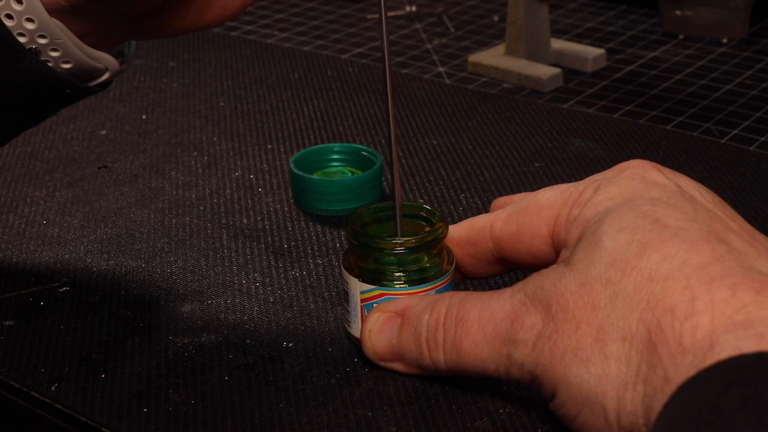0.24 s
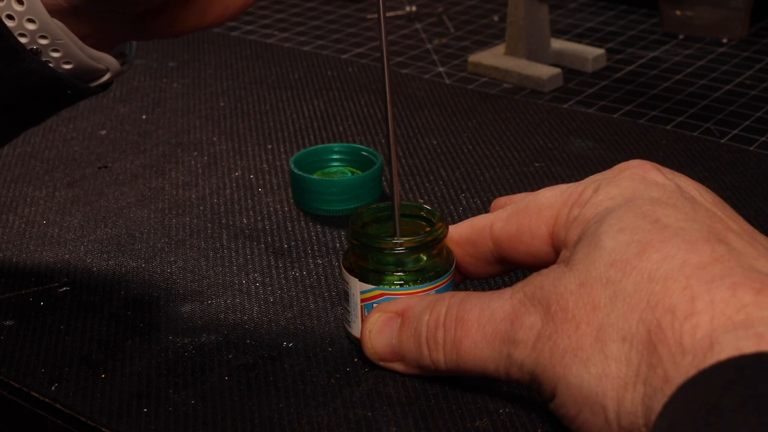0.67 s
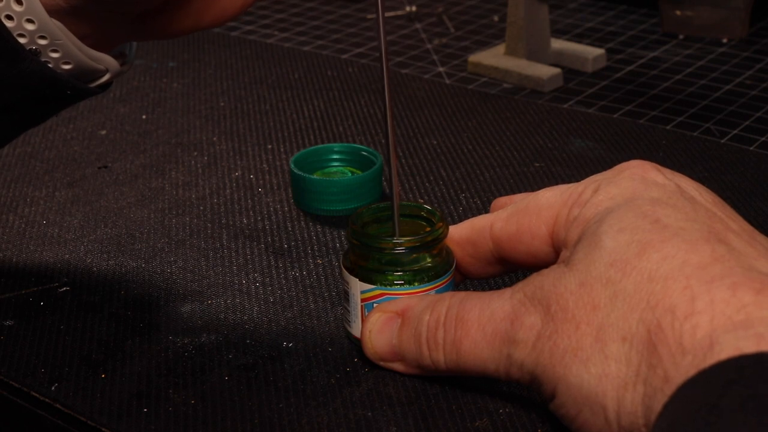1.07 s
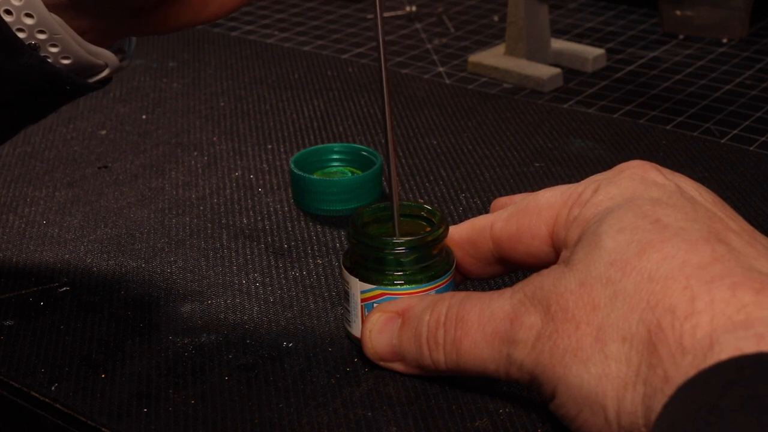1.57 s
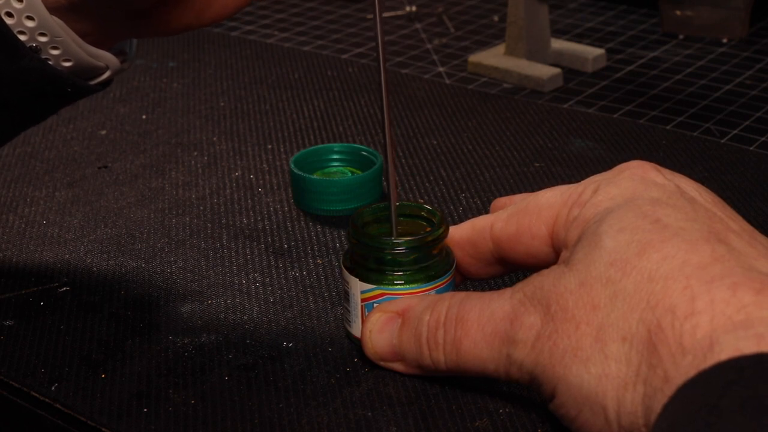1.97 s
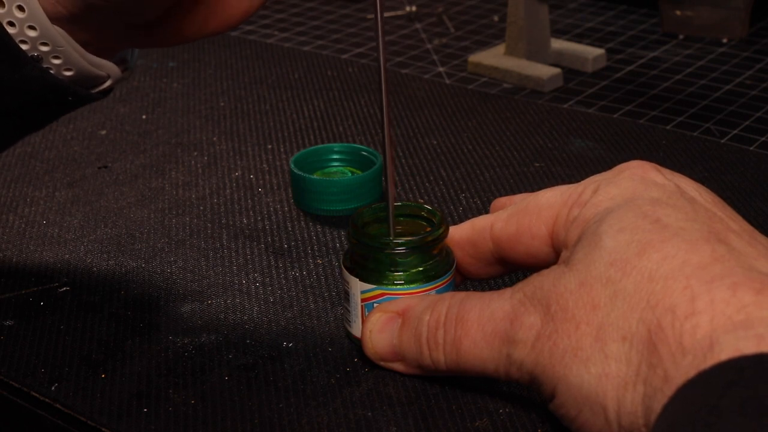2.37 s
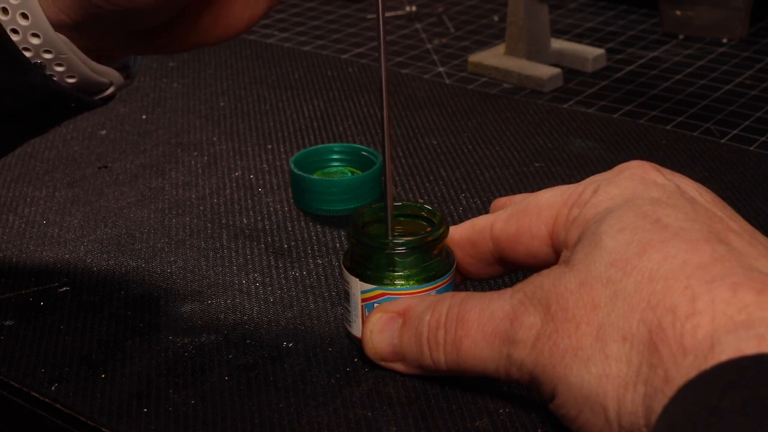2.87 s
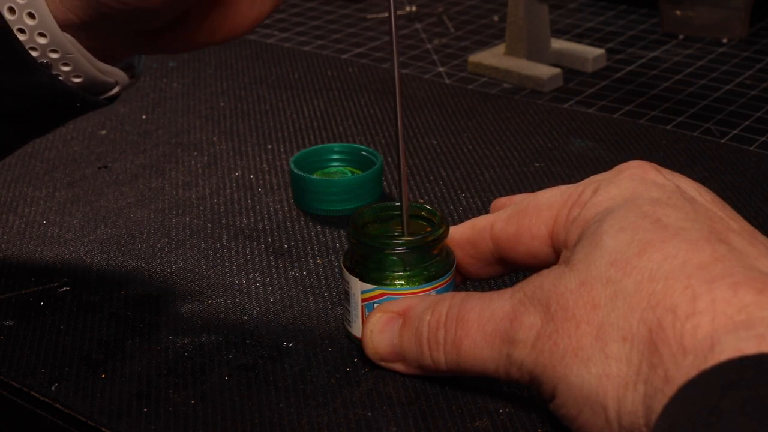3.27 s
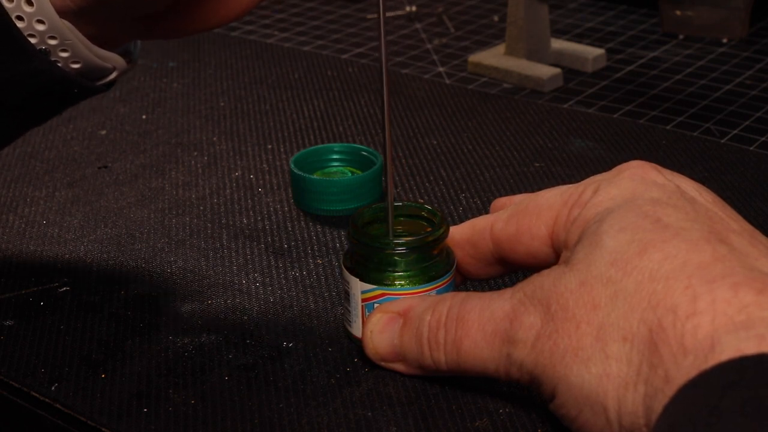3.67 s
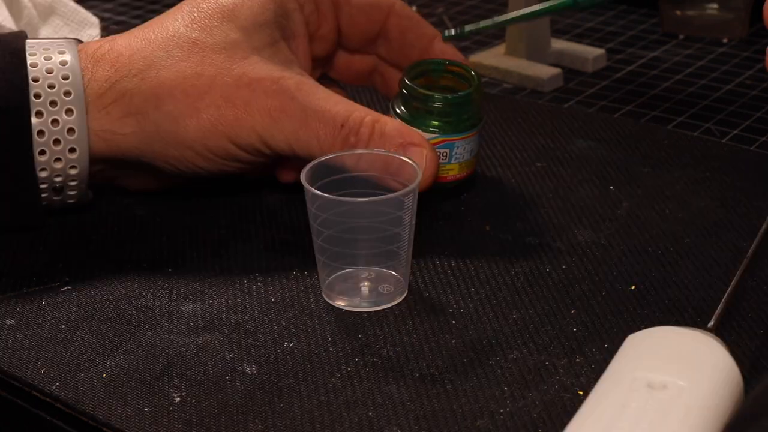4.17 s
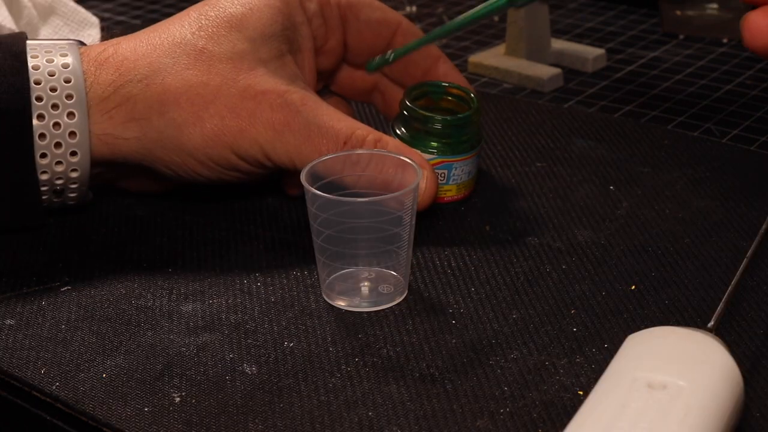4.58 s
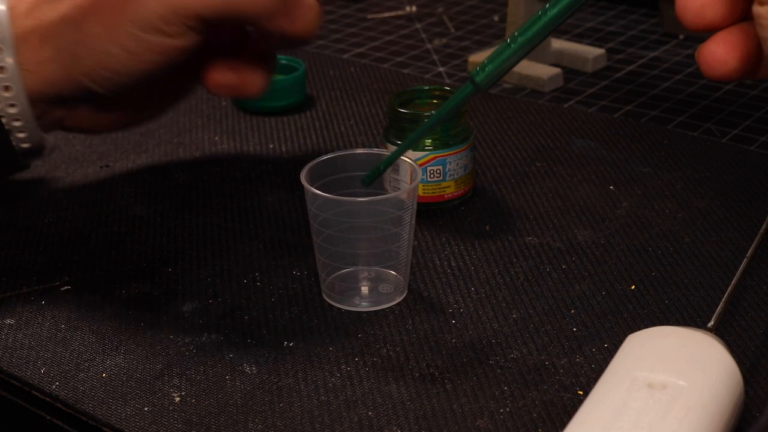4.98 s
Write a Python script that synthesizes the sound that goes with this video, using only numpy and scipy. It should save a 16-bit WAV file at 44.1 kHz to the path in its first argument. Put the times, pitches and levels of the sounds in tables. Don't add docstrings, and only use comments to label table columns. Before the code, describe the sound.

Close stereo microphones on a workbench catch a small handheld electric mixer whirring with a high, fizzy whine and a loose shaft rattling in its housing. Paint soon gulps and sloshes in a glass jar; later the stirrer chatters against the glass in short bursts. The mixer sound cuts off abruptly, leaving quiet room hiss and low hum, with a few small plastic taps and a short slide at the end.

```python
import sys
import numpy as np
from scipy import signal
from scipy.fft import rfft, irfft
from scipy.io import wavfile
from scipy.ndimage import uniform_filter1d

SR = 44100
rng = np.random.default_rng(int(sys.argv[2]) if len(sys.argv) > 2 else 0)


def to_wav(sig):
    pcm = np.clip(np.atleast_2d(sig), -1, 1) * 32767
    pcm = np.round(pcm).astype(np.int16)
    wavfile.write(sys.argv[1], SR, pcm.T)


def gain_from_db(level_db):
    decades = np.asarray(level_db, float) / 20
    return 10 ** decades


N = 231055

# frequency [Hz], level [dB per Hz].
ROOM_HISS = [(30, -100), (45, -81.5), (105, -79.5), (140, -86.5), (500, -89.5), (2000, -96.5), (9000, -104),
             (16000, -109)]
# frequency [Hz], left minus right [dB].
PORT_COLOUR = [(60, 2), (400, 2.5), (700, 1.5), (1300, -1.3), (2400, -3), (4400, 0.4), (8100, -3.5),
               (15000, -2)]
# start [s], peak [dB], pitch [Hz], width [Hz].
PLASTIC_TAPS = [
    (4.413, -41.5, 2700, 500),
    (4.818, -40, 2800, 900),
    (4.821, -45, 139, 45),
    (4.821, -44.5, 245, 60),
    (4.822, -40.5, 446, 250),
    (4.884, -42, 3000, 500),
    (4.912, -43, 5200, 900),
    (4.99, -38, 400, 400),
    (5.001, -38.5, 2350, 300),
    (5.001, -35, 4000, 4000),
]
# time [s], level [dB].
SLIDE_LEVEL = [(4.8, -90), (4.86, -64), (4.883, -57), (4.9, -67), (4.95, -60), (5.0, -58), (5.03, -67),
               (5.1, -67), (5.2, -87)]
# frequency [Hz], width [Hz], level [dB].
CUP_MODES = [(2350, 250, -1), (3000, 350, 0), (3720, 500, -3), (5300, 965, -19)]
# frequency [Hz], width [Hz], level [dB].
BENCH_MODES = [(185, 14, -9), (216, 12, -10), (284, 13, -4), (402, 22, -9), (556, 32, 0), (668, 45, -3)]
# frequency [Hz], width [Hz], level [dB].
JAR_MODES = [(964, 400, -2), (1335.5, 198, -10.5), (1658, 95, -14.5), (1995, 340, -5.5), (2570, 350, -0.5),
             (2942, 306, 1), (3560, 600, -4), (4330, 190, -11), (4880, 510, -7), (6970, 2170, -3),
             (9200, 2600, -5.5), (13300, 1100, -5.5)]
# start [s], number of blows, level [dB].
CHATTER_BOUTS = [(2.8793, 5, -12), (2.9114, 4, -13.5), (2.9377, 3, -11.5), (2.9638, 1, -19),
                 (2.9756, 1, -17.5), (2.9803, 2, -13), (3.0062, 2, -14), (3.0225, 1, -12.5),
                 (3.0378, 1, -13.5), (3.0499, 2, -14), (3.352, 1, -6.5), (3.3572, 2, -14.5),
                 (3.3786, 5, -10), (3.4059, 8, -13.5), (3.457, 3, -11.5), (3.479, 8, -10),
                 (4.1626, 3, -10.5), (4.1843, 1, -16)]
# frequency [Hz], width [Hz], level [dB].
PAINT_MODES = [(2370, 420, -8.5), (2655, 200, 1.5), (2950, 350, 2), (3322, 860, -5), (6520, 1730, 3)]
# time [s], peak [dB], release [s].
PAINT_GULPS = [(0.338, -40, 0.0066), (.41, -35.5, 0.21), (.67, -35.5, 0.018), (.765, -28, 0.016),
               (.8, -40.5, 0.26), (0.984, -33.5, 0.004), (1.1, -39, 0.094), (1.171, -32.5, .015),
               (1.29, -37, 0.62), (1.56, -45, 0.024), (1.75, -39, 0.16), (1.91, -39.5, 0.41)]
# frequency [Hz], width [Hz], level [dB].
HOUSING_MODES = [(930, 127, -6), (1324, 200, -1.5), (1638, 102, -8.5), (1847, 75, -4.5), (2350, 330, 1),
                 (2770, 340, -1), (3600, 380, 1), (4470, 255, -1.5), (6520, 450, -7), (12500, 3000, -29)]
# frequency [Hz], width [Hz], level [dB].
KNOCK_MODES = [(974, 240, -0.5), (1284, 330, -2.5), (1880, 310, 1), (2320, 380, -4), (3000, 460, 0.5),
               (3680, 910, 0.5), (4770, 540, -3.5), (6760, 530, -14)]
# time [s], level [dB].
SHAFT_KNOCKS = [(.0034, -21), (.1985, -23), (.3367, -22), (.4782, -20), (.6613, -21), (.754, -19),
                (.9808, -20), (1.0956, -21), (1.1662, -20), (1.3086, -22), (1.5029, -19), (1.7582, -21),
                (1.8483, -20), (1.9418, -20), (2.0941, -20), (2.2176, -21), (2.3322, -23), (2.415, -20),
                (2.5287, -20), (2.5899, -19), (2.7438, -19), (3.1213, -21), (3.2703, -20), (3.6107, -21),
                (3.7421, -21), (3.9028, -20), (4.0269, -19), (4.1114, -20), (4.1413, -20), (4.208, -20)]
# multiple of the turn rate, level upright [dB], level leaning [dB].
SHAFT_TONES = [(3, -69, -65), (5, -49, -62), (7, -44.5, -59.5), (8, -52, -44), (9, -52, -57),
               (15, -53, -47), (18, -62, -48), (21, -45.5, -51.5), (24, -53.5, -61), (27, -57.5, -62)]
# time [s], lean [0 to 1].
SHAFT_LEAN = [(0, 0.05), (1.0, 0.06), (1.4, 0.3), (1.54, 0.54), (1.7, 0.22), (2.35, 0.05), (2.5, .7),
              (3.4, 0.73), (3.75, 0.99)]
# time [s], turns per second [Hz].
SHAFT_SPEED = [(0, 187.8), (.08, 183.2), (.2, 182), (.8, 183.2), (1.06, 182.7), (1.25, 189.1),
               (1.45, 191.5), (1.7, 194.1), (1.85, 188.7), (2.1, 185), (2.39, 181.1), (2.45, 192.1),
               (2.54, 196.3), (2.85, 194.4), (3.3, 195.5), (3.75, 200.3), (4.1, 201.9), (4.21, 196.3)]
# time [s], change [Hz], rise [s], recovery [s].
STIRRER_SLIPS = [
    (.576, 8, 0.069, 0.082),
    (0.882, 5, .08, 0.063),
    (1.113, 3.5, 0.048, .05),
    (1.321, -2.5, 0.055, 0.11),
    (1.54, 9, 0.081, 0.069),
    (1.975, 7.5, .12, 0.075),
    (2.2, 3.5, .05, .1),
    (2.92, -9, .07, .3),
    (3.42, -5, .06, 0.09),
    (3.509, -11, .1, 0.17),
]
# frequency [Hz], width [Hz], level [dB].
CAN_MODES = [(7560, 1000, -20), (8900, 400, -12), (9520, 380, -2.5), (10460, 900, -1), (10850, 700, -1.5),
             (11390, 550, -11), (12100, 650, -4.5), (13200, 700, -8), (13950, 600, -7.5), (14700, 700, -21)]


def level(x, db):
    return x * gain_from_db(db) / np.sqrt(np.mean(x ** 2))


def butter(x, order, hz, kind):
    return signal.sosfilt(signal.butter(order, hz, kind, fs=SR, output="sos"), x)


def walk(rate, size=N):
    k = int(SR / rate)
    steps = np.repeat(rng.standard_normal(size // k + 1), k)
    return level(uniform_filter1d(uniform_filter1d(steps, k), k)[:size], 0)


def shape(points):
    f = np.maximum(np.arange(N // 2 + 1) * SR / N, 1)
    hz, db = np.transpose(points)
    return gain_from_db(np.interp(np.log(f), np.log(hz), db))


def bump(s, rise_s, fall_s):
    t = np.arange(N) / SR - s
    return np.exp(np.where(t < 0, -2 * (t / rise_s) ** 2, -2 * t / fall_s))


def ring(x, hz, width):
    r, w = np.exp(-np.pi * width / SR), 2 * np.pi * hz / SR
    return signal.lfilter([0, np.sin(w)], [1, -2 * r * np.cos(w), r * r], x)


def rub(noise, modes):
    return sum((-1) ** k * gain_from_db(db) * ring(noise, f, w) for k, (f, w, db) in enumerate(modes))


def strike(times, gains, modes, scatter_db, spread_s, damping=0.57):
    luck = rng.random((len(times), 3, len(modes)))
    share = gain_from_db(np.array(modes)[:, 2])
    out = np.zeros(N)
    for k, (hz, width, _) in enumerate(modes):
        at = ((np.asarray(times) + spread_s * luck[:, 0, k]) * SR).astype(int)
        strength = gains * gain_from_db(scatter_db * (2 * luck[:, 1, k] - 1))
        blows = np.zeros(N)
        np.add.at(blows, at, strength * np.sign(luck[:, 2, k] - .5))
        out += share[k] * ring(blows, hz, damping * width)
    return out / np.sqrt(np.sum(share ** 2))


def place(x, pan_db, wet_db, t60=0.045):
    t = np.arange(SR // 4) / SR
    echo = rng.standard_normal((2, len(t))) * np.exp(-np.log(1000) * t / t60)
    echo = .5 * echo[0] + echo[1] * np.array([[1], [-1]])
    echo = echo * gain_from_db(wet_db) / np.sqrt(np.sum(echo ** 2, axis=1, keepdims=True))
    echo = butter(echo, 1, 600, "high")
    direct = x * gain_from_db(np.array([[pan_db], [-pan_db]]) / 2)
    return direct + signal.fftconvolve(x[None], echo, axes=1)[:, :N]


def room_tone():
    mid, side = rfft(rng.standard_normal((2, N))) * shape(ROOM_HISS)
    side = side * shape([(60, -11.5), (350, -1.5), (1000, -1.0)])
    hiss = irfft(np.array([mid + side, mid - side]), N)
    hum_hz = 53.7 + 1.24 * walk(6.08)
    hum = np.sin(2 * np.pi * np.cumsum(hum_hz) / SR) * gain_from_db(0.34 * walk(4.9))
    return level(hiss, -54.5) + level(hum, -60)


def plastic_taps():
    friction = rng.standard_normal(N) * gain_from_db(3.4 * walk(60))
    slide_db = np.interp(np.arange(N) / SR, *np.transpose(SLIDE_LEVEL))
    slide = level(rub(friction, CUP_MODES), 0) * gain_from_db(slide_db)
    touches = sum(gain_from_db(db + 5) * ring(signal.unit_impulse(N, int(s * SR)), f, w)
                  for s, db, f, w in PLASTIC_TAPS)
    return slide + butter(touches, 2, 90, "high")


def blow_times():
    gap_s, jitter_s, scatter_db = .0054, .0006, 2
    luck = rng.standard_normal((len(CHATTER_BOUTS), 2, 8))
    bouts = []
    for (start, count, db), u in zip(CHATTER_BOUTS, luck):
        n = np.arange(round(count))
        late = jitter_s * u[0, :len(n)] * (n > 0)
        bouts.append((start + n * gap_s + late, db + scatter_db * np.tanh(u[1, :len(n)])))
    return np.concatenate(bouts, axis=1)


def jar():
    s, db = blow_times()
    glass = strike(s, gain_from_db(db), JAR_MODES, scatter_db=1, spread_s=.0018)
    pressure = np.zeros(N)
    pressure[(s * SR).astype(int)] = gain_from_db(db)
    pressure = signal.lfilter([1], [1, -np.exp(-1 / (0.0037 * SR))], pressure)
    grind = gain_from_db(-9) * pressure * level(rub(rng.standard_normal(N), JAR_MODES), 0)
    bench = strike(s, gain_from_db(db - 20.5), BENCH_MODES, scatter_db=1.5, spread_s=0.002)
    return butter(glass + grind + bench, 4, 150, "high")


def paint_level():
    t = np.arange(N) / SR
    deep_from_s, deep_to_s, fade_s = 0.33, 2.18, 0.17
    inside = np.minimum(t - deep_from_s, deep_to_s - t)
    deep = np.clip(inside / fade_s + 1, .05, 1)
    gulps = sum(gain_from_db(db) * bump(s, 0.015, fall) for s, db, fall in PAINT_GULPS)
    return 20 * np.log10(gain_from_db(-40.5) * deep + gulps)


def slosh(turns):
    once_a_turn = 1.6 + np.exp(-(turns % 1) / 0.26)
    slaps = rng.standard_normal(N) * once_a_turn * gain_from_db(1.83 * walk(60.25))
    gurgle = sum(gain_from_db(db) * ring(slaps, f, w) for f, w, db in PAINT_MODES)
    return gain_from_db(paint_level()) * level(butter(gurgle, 3, [1900, 7500], "band"), 0)


def knock_times(turns):
    hard, hard_db = np.transpose(SHAFT_KNOCKS)
    between = np.diff(turns[(hard * SR).astype(int)])
    slow = between / np.diff(hard) < 187.5
    laps = between / np.where(slow, 4, 3.1)
    light = np.concatenate([np.linspace(a, b, round(n) + 1)[1:-1] for a, b, n in zip(hard, hard[1:], laps)])
    luck = rng.standard_normal((400, 2))[:len(light)].T
    light_db = -22.5 + 2 * np.tanh(luck[1])
    return np.r_[hard, light + .0009 * luck[0]], np.r_[hard_db, light_db]


def housing(turns, body_db):
    each = np.flatnonzero(np.diff(turns // 1))[:-1] / SR
    tap_gains = gain_from_db(8 * np.tanh(rng.standard_normal(len(each))))
    taps = strike(each, tap_gains, HOUSING_MODES, scatter_db=8, spread_s=.0012)
    s, db = knock_times(turns)
    knocks = strike(s, gain_from_db(db + 3.5), KNOCK_MODES, scatter_db=1.5, spread_s=.0003, damping=0.89)
    friction = rub(rng.standard_normal(N), HOUSING_MODES)
    body = gain_from_db(body_db) * (level(taps, -2.45) + level(friction, -4.4)) + knocks
    return butter(body, 6, 840, "high")


def shaft_tones(hz, turns):
    null_hz, null_width_hz = 203.5, 8.4
    off = (hz - null_hz) / null_width_hz
    hum_db = -56.5 + 10 * np.log10(off ** 2 / (1 + off ** 2) + 0.008)
    lean = np.clip(np.interp(np.arange(N) / SR, *np.transpose(SHAFT_LEAN)), 0, 1)
    out = gain_from_db(hum_db) * np.sqrt(2) * np.sin(2 * np.pi * turns)
    for k, upright_db, leaning_db in SHAFT_TONES:
        db = upright_db + lean * (leaning_db - upright_db) + 1.45 * walk(12)
        out += gain_from_db(db) * np.sqrt(2) * np.sin(2 * np.pi * (round(k) * turns + rng.random()))
    return out


def shaft_speed():
    t = np.arange(0, N, 64) / SR
    hz = np.interp(t, *np.transpose(SHAFT_SPEED))
    for s, change_hz, rise, back in STIRRER_SLIPS:
        onset = np.clip(1 + (t - s) / rise, 0, 1)
        recovery = np.clip(1 - (t - s) / back, 0, 1) ** 1.5
        hz = hz + change_hz * np.where(t < s, onset, recovery)
    return uniform_filter1d(np.interp(np.arange(N) / SR, t, hz), SR // 40)


def brushes(hz, turns):
    step = 64
    slow, lines = hz[::step], np.zeros(N)
    turn = np.exp(2j * np.pi * turns)
    spin = turn ** 32
    for k in range(33, 82):
        spin = spin * turn
        can = np.sqrt(sum(gain_from_db(2 * db) / (1 + (2 * (k * slow - f) / w) ** 2) ** 2 for f, w, db in CAN_MODES))
        weak = k % 3 > 0
        wander_db = 2.5 * (1 if weak else .4) * walk(2.56 * step, size=len(slow))
        size = can * gain_from_db(-10 * weak + wander_db)
        lag = np.exp(1j * (3 if weak else .35) * rng.standard_normal())
        lines += np.repeat(size, step)[:N] * (spin * lag).real
    sparks = rng.standard_normal(N) * np.exp(-((3 * turns + 0.11) % 1) / 0.39)
    hiss = sum(gain_from_db(db) * level(ring(sparks, f, 0.56 * w), 0) for f, w, db in CAN_MODES)
    return level(lines, 0) + level(hiss, -7)


def mixer():
    hz = shaft_speed()
    turns = np.cumsum(hz * (1 + .0009 * walk(70))) / SR
    faster_hz = hz - 184
    whine = gain_from_db(-34.5 + 0.146 * faster_hz) * brushes(hz, turns)
    top = signal.sosfiltfilt(signal.butter(4, 11700, "high", fs=SR, output="sos"), whine)
    motor = place(whine - top, pan_db=1.2, wet_db=-14, t60=.012)
    motor += gain_from_db(-.5) * place(top, pan_db=1.5, wet_db=-2, t60=.04)
    stirring = housing(turns, -39.5 + 0.2047 * faster_hz) + shaft_tones(hz, turns) + slosh(turns)
    return motor + place(stirring, pan_db=1.1, wet_db=-4.5) + place(jar(), pan_db=-0.5, wet_db=-4)


def scene():
    t = np.arange(N) / SR
    change_s, fade_s = 4.212, 0.0019
    mixer_gain = np.exp(-np.maximum(t - change_s, 0) / fade_s)
    return mixer() * mixer_gain + place(plastic_taps(), pan_db=0, wet_db=-3) + room_tone()


def low_pass(x):
    return signal.sosfilt(signal.butter(12, 15960, fs=SR, output="sos"), x)


def record(dry):
    tilt = np.sqrt(shape(PORT_COLOUR))
    ports = irfft(rfft(dry) * np.array([tilt, 1 / tilt]), N)
    ports = signal.sosfilt(signal.ellip(8, .3, 70, 15850, fs=SR, output="sos"), ports)
    return low_pass(ports)


dry = scene()
out = record(dry)
to_wav(out)
```